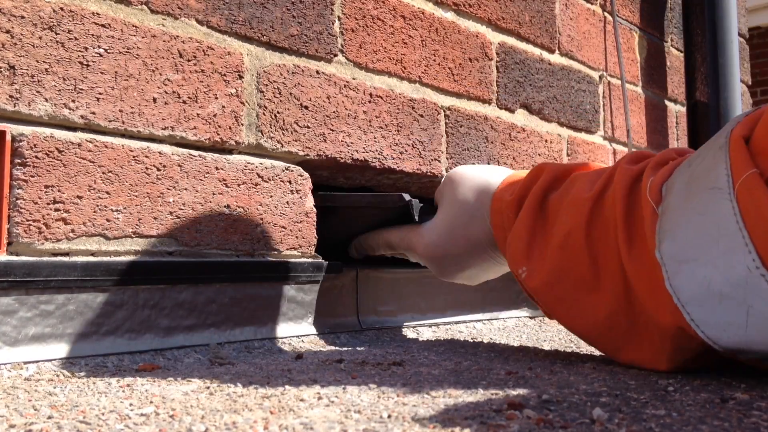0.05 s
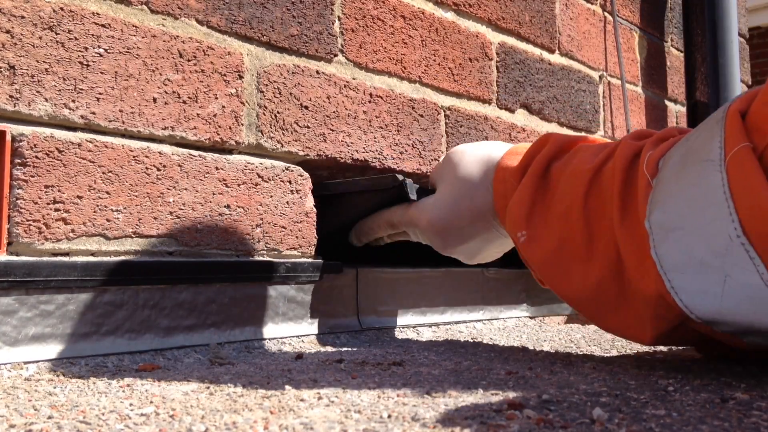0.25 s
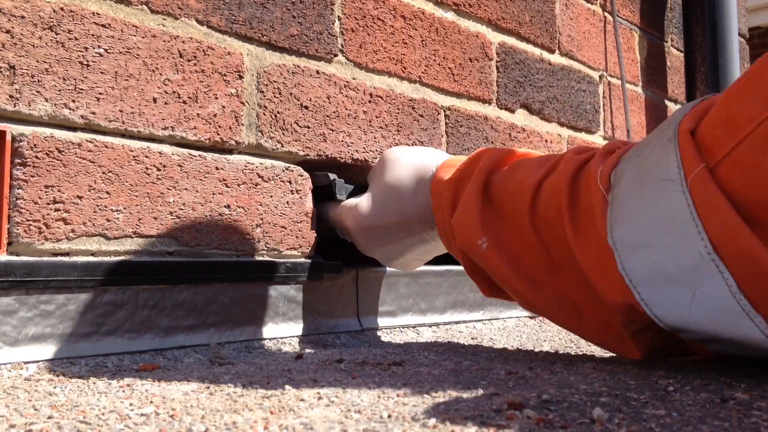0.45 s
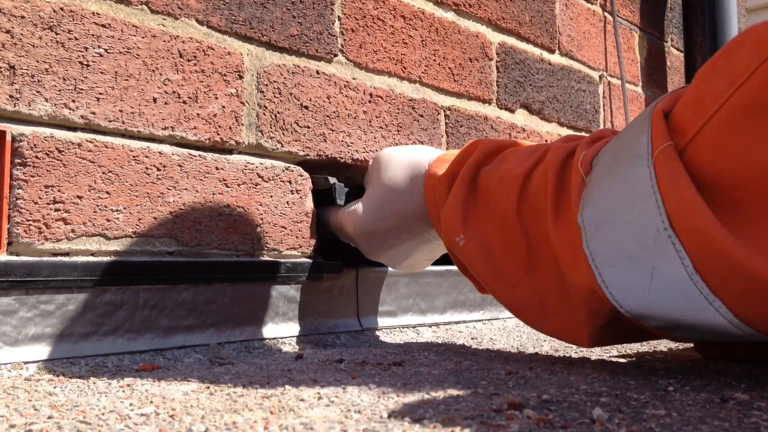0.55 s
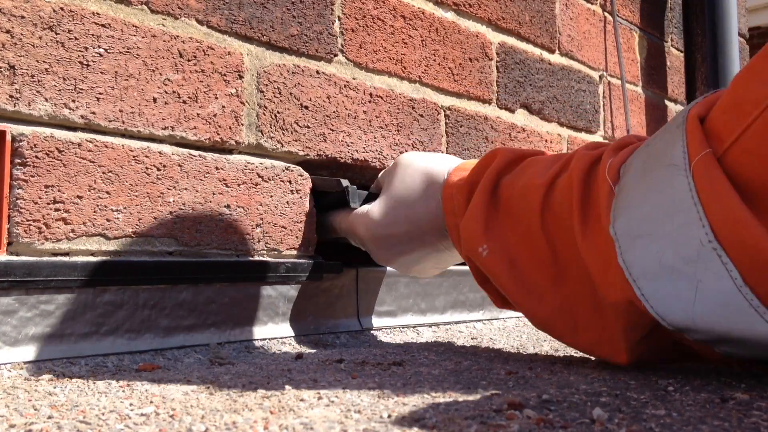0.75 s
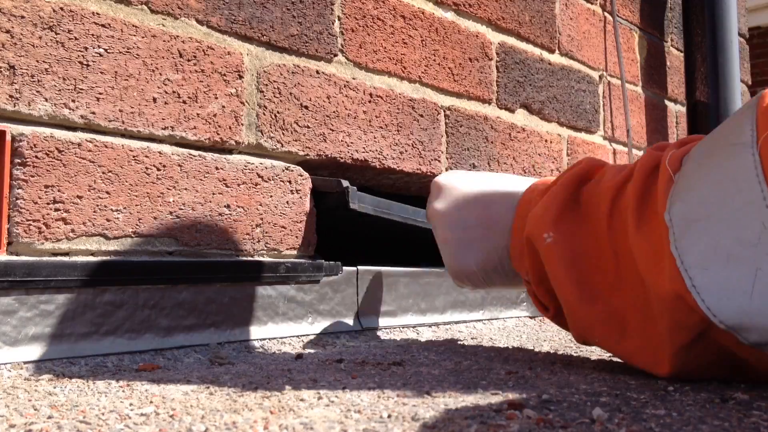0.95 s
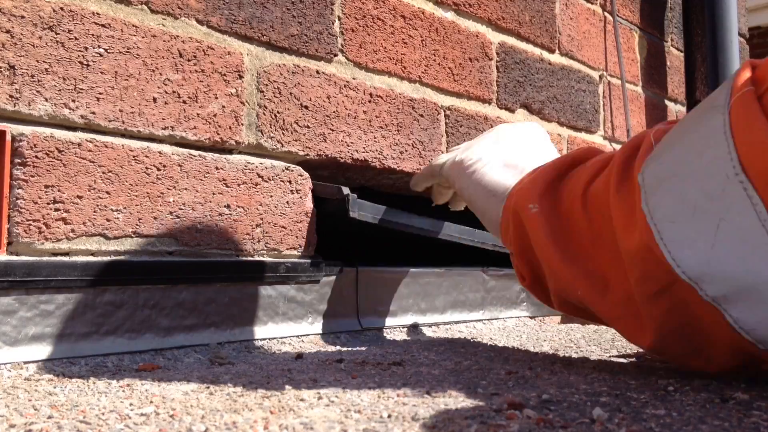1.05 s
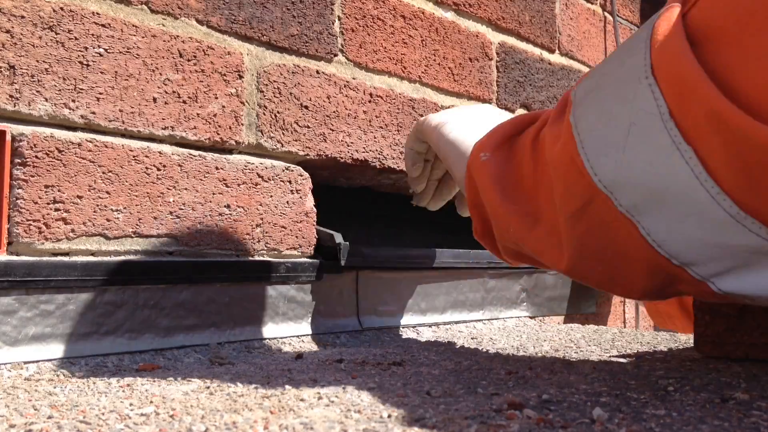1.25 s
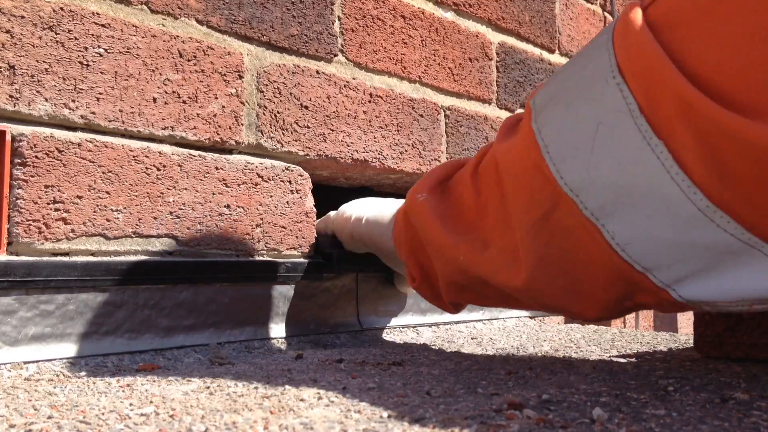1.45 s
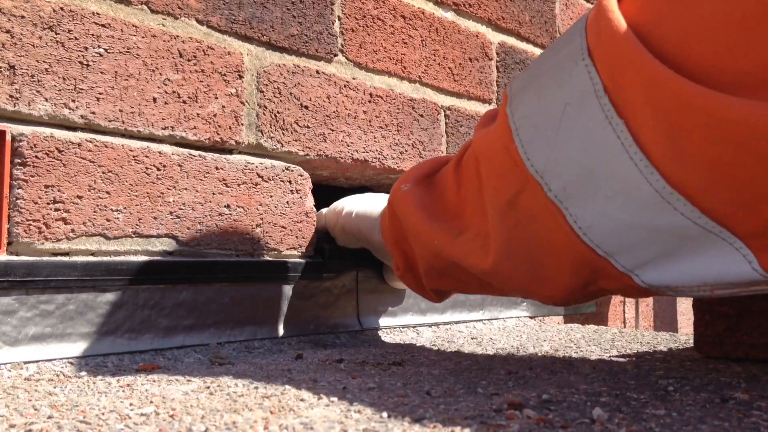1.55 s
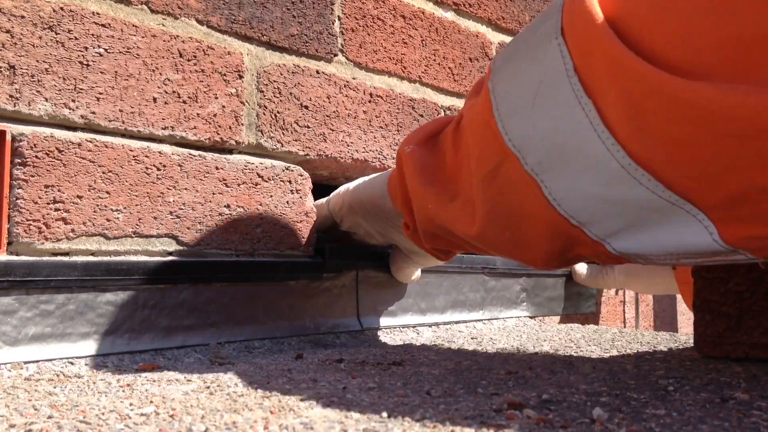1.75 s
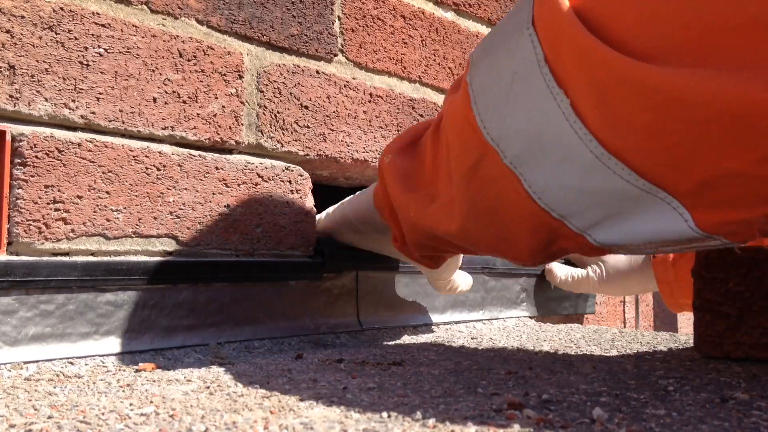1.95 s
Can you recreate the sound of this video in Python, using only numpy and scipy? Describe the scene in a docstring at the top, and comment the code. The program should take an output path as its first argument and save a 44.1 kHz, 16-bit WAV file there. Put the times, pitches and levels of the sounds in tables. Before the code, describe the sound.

A stiff strip knocks and rasps against bricks, close by outdoors.

```python
"""A stiff strip knocks dully against bricks as a hand works it into a gap in a wall, outdoors and close by.
Each knock rings the spot it hits and the hollow behind the bricks. The strip grinds over grit, and its edge
catches and slips in quick, rasping snaps. A jacket sleeve rustles and now and then swishes with a thin, high
hiss over a low outdoor rumble."""
import sys
import numpy as np
from scipy import signal
from scipy.fft import rfft, irfft
from scipy.io import wavfile
from scipy.ndimage import uniform_filter1d

SR = 44100
rng = np.random.default_rng(int(sys.argv[2]) if len(sys.argv) > 2 else 0)


def unload_audio(sound):
    """Save the sound as a 16-bit wav file, at the path given as the first command line argument."""
    columns = np.transpose(np.atleast_2d(sound))
    # keep every value between -1 and 1, then stretch to whole-number steps
    steps = np.round(np.clip(columns, -1, 1) * 32767)
    wavfile.write(sys.argv[1], SR, steps.astype(np.int16))


N = 88200
TIME = np.arange(N) / SR
EVENT_TIME = TIME[:SR // 5]  # clock for one short sound, in seconds

# tone of an edge rasping on brick: pitch_hz, level_db
RASP_TONE = [(100, -44), (800, -19), (1400, 8), (2000, 4), (2400, -1.5), (2850, 5), (3400, 4), (4300, -4),
             (5500, -4.5), (6500, -4.5), (9000, -6), (10200, -10.5), (12500, -10.5), (16000, -40)]


def knocks():
    """Each blow rings the struck spot and the hollow, thumps the wall, crushes grit and clicks."""
    # the blows: start_s, rise_s, spot_pitch_hz, spot_fade_s, spot_db, hollow_db, thump_db,
    # crunch_db, crunch_fade_s, tick_db, snap_db
    blows = [ (.0748, 0.0012, 349, 0.056, -21.5, -34, -55, -17, 0.021, -37, -57),
             (0.133, 0.0031, 281, 0.041, -36, -38, -42, -34, .03, -44, -50),
             (.1738, 0.0012, 2950, 0.0084, -13, -59, -57, -39, .012, -24.5, -23),
             (.1745, 0.00036, 1870, .025, -21, -63, -52, -46, 0.008, -28.5, -31),
             (.2115, 0.00086, 4600, 0.011, -30.5, -62, -42, -18.5, 0.022, -39, -41),
             (.2148, 0.00082, 890, 0.017, -7.5, -24, -53, -33, 0.01, -50, -60),
             (.2630, 0.00083, 790, 0.011, -38, -33, -34, -29, 0.014, -33.5, -54),
             (.2668, 0.0011, 459, 0.019, -10, -28, -38, -44, 0.018, -59, -60),
             (.3755, 0.0028, 1126, .025, -9, -42, -56, -17.5, 0.035, -60, -55),
             (.3800, 0.0024, 291, 0.035, -9.5, -17.5, -43, -18, 0.011, -67, -60),
             (.4595, 0.00087, 1310, 0.011, -32, -55, -52, -32, 0.014, -59, -60),
             (.4855, .003, 1214, 0.057, -18.5, -39, -52, -29, 0.034, -35, -52),
             (.5005, 0.0018, 346, 0.016, -12, -1, -34, -7, 0.043, -11.5, -21.5),
             (.5365, 0.0018, 3240, 0.019, -19.5, -45, -50, -13.5, 0.026, -21, -40),
             (.5446, 0.00037, 2055, 0.024, -16, -26, -33, -14, 0.058, -23.5, -34.5),
             (.6880, .008, 325, 0.1, -25, -44, -55, -30, 0.086, -56, -64),
             (.8250, 0.01, 151, 0.14, -28, -65, -55, -53, .03, -52, -62),
             (1.1720, 0.0058, 718, 0.063, -14.5, -33, -43, -39, 0.026, -45, -42),
             (1.1895, 0.00067, 1006, 0.032, -17.5, -28.5, -54, -34, 0.027, -29, -50),
             (1.2165, 0.00081, 900, 0.029, -23, -30, -47, -25, 0.02, -50, -55),
             (1.3180, 0.0023, 1041, 0.088, -16, -12, -47, -11, 0.038, -18, -28),
             (1.3197, 0.0028, 247, 0.064, -24.5, -43, -30, -37, 0.015, -17, -50),
             (1.3213, 0.00053, 749, 0.037, 2.5, -13.5, -17, -14.5, 0.033, -42, -50),
             (1.3366, 0.00069, 1750, 0.026, -14.5, -23, -38, -21, 0.018, -25, -47),
             (1.4070, 0.00092, 1900, 0.012, -20.5, -32.5, -52, -27, 0.022, -38, -50),
             (1.4915, 0.00074, 1610, 0.0081, 3, -34, -50, -19, 0.031, -16, -24.5),
             (1.493, 0.00044, 4810, 0.015, -20.5, -51, -57, -44, 0.022, -30, -49),
             (1.5560, 0.0032, 443, 0.048, -26.5, -40, -43, -46, 0.033, -52, -50),
             (1.6220, 0.0012, 4100, 0.011, -31, -63, -52, -40, 0.018, -39, -48),
             (1.6400, 0.00034, 4580, 0.0086, -22, -46, -39, -27, 0.058, -27.5, -42),
             (1.6560, 0.0036, 1170, 0.016, -13.5, -51, -52, -23.5, 0.02, -34, -55),
             (1.6708, 0.0008, 380, 0.037, -21.5, -39, -26.5, -26, 0.02, -33.5, -37.5),
             (1.6848, 0.00062, 720, 0.0099, -15.5, -49, -30, -34, 0.023, -35.5, -46),
             (1.934, 0.0073, 78, 0.14, -20, -38, -30, -48, 0.044, -62, -68)]
    # notes of the hollow in the wall: pitch_hz, level_db, fade_s
    hollow_notes = [(188.8, -13.5, 0.15), (310, -10.5, 0.096), (364, -8, 0.074), (460.7, -0.5, 0.071),
                    (536, -8.5, 0.047), (652.4, -20.5, 0.18), (761.4, -7, .09), (910, -11, 0.049),
                    (1023, -13, .07), (1140, -8.5, 0.054), (1300, -30, 0.051), (1210, -16, 0.04),
                    (1505, -14.5, 0.037), (1640, -48, 0.071)]
    # tones of crushed grit, the sharp contact and its thin, high snap: pitch_hz, level_db
    crunch_tone = [(60, -26), (180, -1), (400, -3.5), (600, -3), (1100, -0.5), (1500, -6.5), (1950, -4),
                   (2250, -17), (2600, -26), (4500, -38), (8000, -46), (16000, -58)]
    tick_tone = [(200, -59), (1200, -19.5), (2450, 14), (2700, 6), (3300, 9.5), (4100, 3), (4900, 1.5),
                 (5800, -5.5), (7500, -32), (16000, -36)]
    snap_tone = [(2000, -71), (5000, -8), (6500, 2.5), (8500, -1), (11000, 2), (13500, -2), (16000, 0)]
    hollow = sum((-1) ** k * gain(db) * ring(hz, fade_s, rise_s=0.0011)
                 for k, (hz, db, fade_s) in enumerate(hollow_notes))
    thump = ring(pitch_hz=102, fade_s=0.098, rise_s=0.0023)
    out = np.zeros(N)
    for (start_s, rise_s, spot_pitch_hz, spot_fade_s, spot_db, hollow_db, thump_db,
         crunch_db, crunch_fade_s, tick_db, snap_db) in blows:
        spot = gain(spot_db) * ring(spot_pitch_hz, spot_fade_s, rise_s)
        wall = gain(hollow_db) * hollow + gain(thump_db) * thump
        crunch = gain(crunch_db) * burst(crunch_tone, crunch_fade_s, rise_s)
        tick = gain(tick_db) * burst(tick_tone, fade_s=0.016, rise_s=rise_s)
        snap = gain(snap_db) * burst(snap_tone, fade_s=0.012, rise_s=rise_s)
        add(out, start_s, spot + wall + crunch + tick + snap)
    return out


def slips():
    """The edge stutters along rough brick in short, bright snaps that ring the strip."""
    # each time the edge catches and slips: start_s, level_db
    catches = [(0.153, -36), (.1655, -30), (0.2385, -44), (0.9057, -32.5), (0.9656, -27.5), (0.98, -21),
               (0.9884, -21), (0.9999, -16.5), (1.0159, -20.5), (1.0208, -21), (1.0276, -17), (1.035, -23),
               (1.042, -28), (1.0498, -17.5), (1.0625, -21), (1.0736, -15), (1.0847, -28), (1.091, -27),
               (1.097, -20), (1.1032, -17.5), (1.1325, -26), (1.169, -21.5)]
    # notes of the stiff strip: pitch_hz, level_db, fade_s
    strip_notes = [(1420, -41, 0.077), (1438, -18.5, 0.075), (1847, -19.5, 0.074), (2240, -30, 0.091),
                   (2804, -23, 0.089), (3060, -23, 0.08), (3260, -31, 0.098)]
    rise_s = 0.00067
    notes = np.array([gain(db) * ring(hz, fade_s, rise_s) for hz, db, fade_s in strip_notes])
    out = np.zeros(N)
    for start_s, level_db in catches:
        rasp = burst(RASP_TONE, fade_s=0.017, rise_s=rise_s)
        ringing = rng.choice([-1, 1], len(notes)) @ notes  # each note starts up or down at random
        add(out, start_s, gain(level_db) * (rasp + ringing))
    return out


def scraping():
    """Each stroke over the brick swells and dies, part dull grinding and part bright sliding."""
    # the strokes: start_s, peak_s, end_s, dull_db, bright_db
    strokes = [(0.097, 0.147, 0.25, -45, -43.5), (0.227, 0.247, 0.32, -39.5, -71),
               (0.481, 0.514, 0.5946, -19.5, -40.5), (0.628, 0.706, 0.744, -34, -67),
               (0.805, 1.044, 1.29, -47, -40.5), (1.122, 1.186, 1.24, -31.5, -44.5),
               (1.252, 1.264, 1.26, -47, -49.5), (1.309, 1.317, 1.344, -20, -68),
               (1.503, 1.526, 1.53, -51, -72), (1.633, 1.657, 1.68, -31.5, -54)]
    # tone of the dull grinding: pitch_hz, level_db
    grind_tone = [(60, -8), (200, -10.5), (330, 0.5), (620, 3.5), (1100, -1), (1950, -5), (2600, -18.5),
                  (4500, -22.5), (8000, -56), (16000, -44)]
    dull, bright = np.zeros(N), np.zeros(N)
    for start_s, peak_s, end_s, dull_db, bright_db in strokes:
        push = np.interp(TIME, [start_s, peak_s, end_s], [0, 1, 0]) ** 1.16
        dull += gain(dull_db) * push
        bright += gain(bright_db) * push
    return dull * friction(grind_tone) + bright * friction(RASP_TONE)


def sleeve():
    """Stiff cloth rustles as the arm moves."""
    # how loud the rustle is: time_s, level_db
    levels = [(0, -53), (.08, -55.5), (.16, -57), (.24, -58), (.42, -54.5), (.54, -58), (.59, -72),
              (.69, -66), (.74, -49.5), (.78, -60), (.83, -50), (.95, -43.5), (1.18, -39.5), (1.25, -62),
              (1.31, -48), (1.44, -59), (1.55, -43.5), (1.60, -62.5), (1.77, -57.5), (1.89, -51), (2, -55)]
    # tone of the cloth: pitch_hz, level_db
    cloth_tone = [(500, 0), (2000, 6), (4000, 7), (7000, -3.5), (10000, 1.5), (14000, 0), (16000, 7.5)]
    return gain(np.interp(TIME, *np.transpose(levels))) * friction(cloth_tone)


def sleeve_swish(width_hz=2800):
    """The sleeve swishes past with a thin, high hiss."""
    # the swishes: peak_s, half_length_s, level_db, pitch_hz
    swishes = [(0.734, 0.0065, -46, 13500), (0.757, .007, -51, 13900), (0.835, 0.061, -52, 9800),
               (1.164, 0.0097, -37.5, 13300), (1.205, 0.033, -49, 12900), (1.248, 0.024, -59, 11400),
               (1.313, .02, -48, 13300), (1.814, 0.0089, -55, 10100)]
    hz = np.fft.rfftfreq(len(EVENT_TIME), 1 / SR)
    out = np.zeros(N)
    for peak_s, half_length_s, level_db, pitch_hz in swishes:
        band = 1 / (1 + (2 * (hz - pitch_hz) / width_hz) ** 2)
        hiss = unit_level(irfft(rfft(rng.standard_normal(len(EVENT_TIME))) * band))
        swell = np.interp(EVENT_TIME, [0, half_length_s, 2 * half_length_s], [0, 1, 0])
        add(out, peak_s - half_length_s, gain(level_db) * hiss * swell)
    return out


def wall_echoes(sound, cutoff_hz=3240):
    """Sound bounces off nearby surfaces and leaves a faint, dull tail."""
    # echoes from the wall and the ledge: delay_s, level_db
    echoes = [(.0023, -24.5), (.0041, -18.5)]
    tail = signal.lfilter(*signal.butter(2, cutoff_hz, fs=SR), rng.standard_normal(len(EVENT_TIME)))
    tail *= fade(fade_s=0.08, rise_s=0.005)
    response = gain(-23) * tail / np.linalg.norm(tail)
    response[0] += 1  # the direct sound
    for delay_s, level_db in echoes:
        add(response, delay_s, gain([level_db]))
    return signal.fftconvolve(sound, response)[:N]


def outdoors():
    """An uneven low rumble and a steady, distant wash of noise."""
    # how loud the rumble is: time_s, level_db
    levels = [(0, -35), (.08, -45.5), (.3, -37.5), (.86, -45), (.93, -34), (1.12, -38), (1.22, -48.5),
              (1.36, -31.5), (1.6, -36), (1.8, -36.5), (1.91, -32.5), (1.95, -21.5), (2, -30)]
    # tones of the rumble and the wash: pitch_hz, level_db
    rumble_tone = [(20, 2), (35, -21), (47, -2), (59, 1), (80, -8), (120, -11.5), (180, -15.5),
                   (300, -25.5), (1000, -91)]
    wash_tone = [(40, -2.5), (120, 1.5), (250, -6.5), (500, -6.5), (800, -4.5), (1300, -8), (2000, -16),
                 (3000, -29), (6000, -39), (16000, -56)]
    rumble = gain(np.interp(TIME, *np.transpose(levels))) * with_tone(rng.standard_normal(N), rumble_tone)
    wash = gain(-41.5) * with_tone(rng.standard_normal(N), wash_tone)
    return rumble + wash


def ring(pitch_hz, fade_s, rise_s):
    """One note of a struck object, dying away."""
    return np.sin(2 * np.pi * pitch_hz * EVENT_TIME) * fade(fade_s, rise_s)


def burst(tone, fade_s, rise_s, size=4096):
    """A short, dying spray of noise with the given tone."""
    shape = fade(fade_s, rise_s)[:size]
    spectrum = rfft(rng.standard_normal(size) * shape)
    spectrum /= np.sqrt(uniform_filter1d(abs(spectrum) ** 2, size=25))  # even out chance peaks
    spray = unit_level(irfft(spectrum * tone_gains(tone, size))) * np.sqrt(np.mean(shape ** 2))
    soft_end = np.minimum(np.linspace(2, 0, size), 1) ** 2
    return np.pad(spray * soft_end, (0, len(EVENT_TIME) - size))


def friction(tone, grains_per_s=4000, spread_db=4):
    """Rubbing: tiny catches of uneven size, mixed with smooth noise."""
    sizes = gain(spread_db * np.minimum(rng.exponential(1, N), 5))
    grains = sizes * rng.choice([-1, 1], N) * (rng.random(N) < grains_per_s / SR)
    return with_tone(unit_level(grains) + rng.standard_normal(N), tone)


def fade(fade_s, rise_s):
    """A quick rise and a decay that loses 60 dB every fade_s."""
    return np.minimum(EVENT_TIME / rise_s, 1) * gain(-60 * EVENT_TIME / fade_s)


def tone_gains(tone, size):
    """Turns a tone table into a gain for each frequency."""
    pitch_hz, level_db = np.transpose(tone)
    hz = np.fft.rfftfreq(size, 1 / SR)
    return gain(np.interp(np.log(hz + 1), np.log(pitch_hz), level_db))


def with_tone(sound, tone):
    """Gives a steady sound a tone, at average level 1."""
    return unit_level(irfft(rfft(sound) * tone_gains(tone, len(sound)), len(sound)))


def unit_level(sound):
    """Scales a sound to an average (rms) level of 1."""
    return sound / np.sqrt(np.mean(sound ** 2) + 1e-20)


def gain(db):
    """Turns decibels into a multiplier."""
    return 10 ** (np.asarray(db) / 20)


def add(mix, start_s, sound):
    """Mixes a sound in at start_s."""
    part = mix[max(round(start_s * SR), 0):][:len(sound)]
    part += sound[:len(part)]


def scene():
    """The work at the wall, the clothing and the outdoor background, in mono."""
    work = wall_echoes(knocks() + slips() + scraping())
    return (work + sleeve() + sleeve_swish() + outdoors())[None]


def record(dry, low_cut_hz=42, high_cut_hz=15300):
    """Cuts the deepest bass, dips the level after hard blows, clips peaks and cuts the top treble."""
    threshold_db, dip_share, recover_db_per_s, smooth_s = -24.5, 0.17, 48, 0.0077
    sound = signal.lfilter(*signal.butter(4, low_cut_hz, "high", fs=SR), dry[0])
    memory = np.exp(-1 / (smooth_s * SR))
    level_db = 10 * np.log10(signal.lfilter([1 - memory], [1, -memory], sound ** 2) + 1e-12)
    fall_db = TIME * recover_db_per_s
    held_db = np.maximum.accumulate(level_db + fall_db) - fall_db  # jumps up, sinks slowly
    over_db = np.maximum(held_db - threshold_db, 0)
    sound = np.clip(sound * gain(-dip_share * over_db), -1, 1)
    treble_cut = signal.firwin(255, high_cut_hz, window=("kaiser", 8), fs=SR)
    return signal.oaconvolve(sound, treble_cut, "same")[None]


dry = scene()
out = record(dry)
unload_audio(out)
```